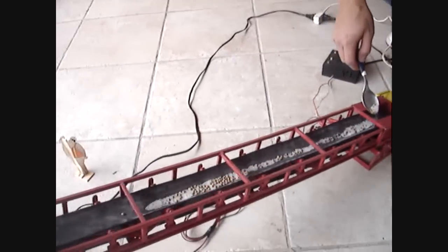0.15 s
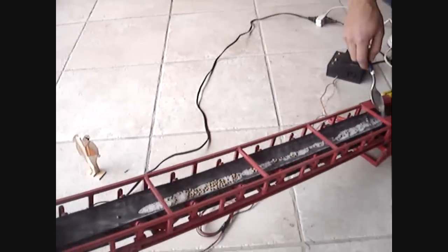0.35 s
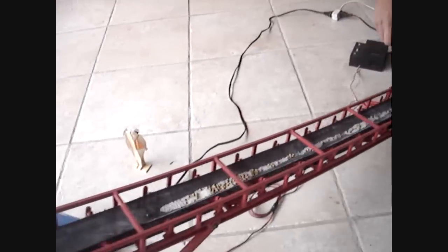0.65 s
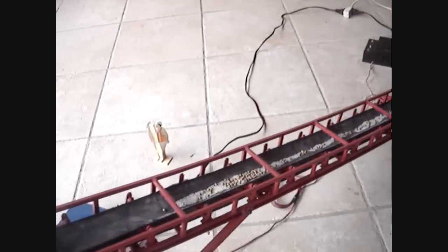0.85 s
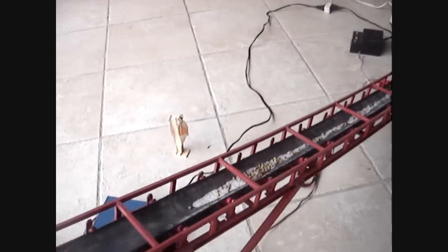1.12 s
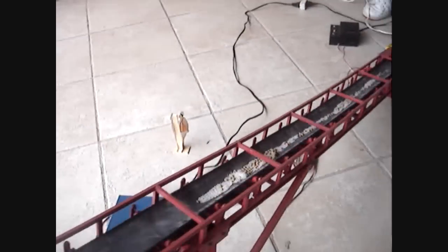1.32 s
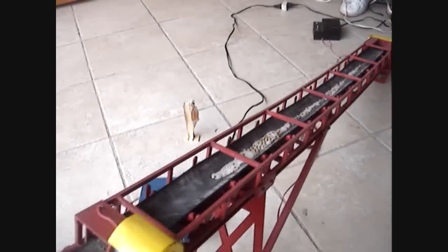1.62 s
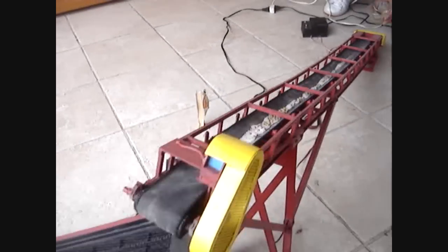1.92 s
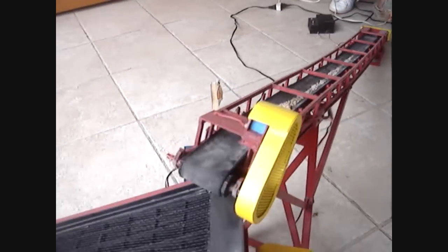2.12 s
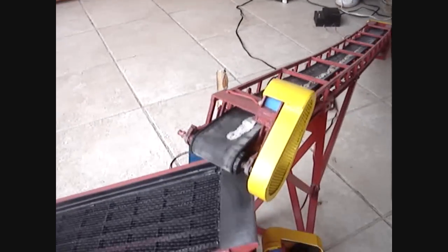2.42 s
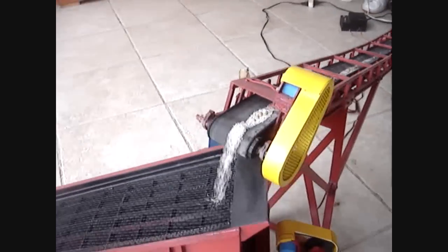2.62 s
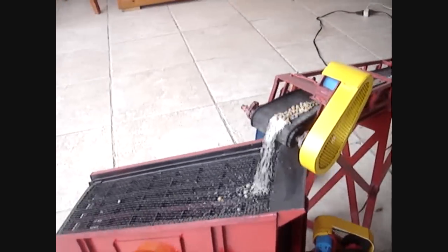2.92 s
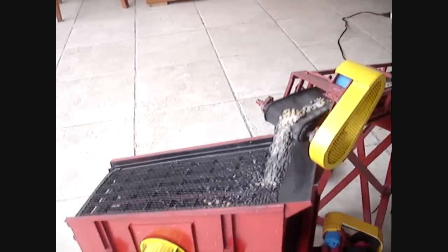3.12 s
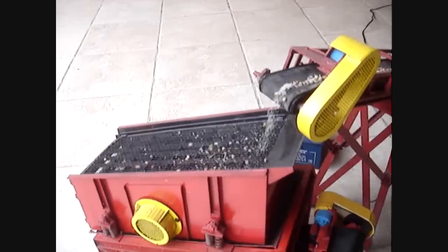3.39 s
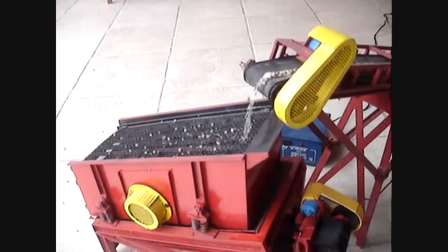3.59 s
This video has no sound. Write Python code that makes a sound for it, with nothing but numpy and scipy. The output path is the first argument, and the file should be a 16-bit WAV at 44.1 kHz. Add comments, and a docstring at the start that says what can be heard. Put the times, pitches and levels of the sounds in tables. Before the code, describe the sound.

A miniature belt drive and shaking steel screen rattle harshly indoors as fine gravel clatters down

```python
"""First comes the fluttering churn of a model conveyor's belt drive, with hollow knocks and wavering tones.
Its motor carries fine gravel up to a vibrating screen, on a tiled floor indoors.
The screen's loose steel deck chatters on every turn of its eccentric shaft, made of bursts of tiny impacts.
The microphone moves up the belt to the screen: brief rattles and hard clashes of the deck are heard.
Then gravel starts to pour onto the mesh, as random clicks shaped by filters, with ringing pings of steel."""
import sys
import numpy as np
from scipy import signal
from scipy.fft import rfft, irfft, next_fast_len
from scipy.io import wavfile

SR = 44100
rng = np.random.default_rng(int(sys.argv[2]) if len(sys.argv) > 2 else 0)


def persist_wave(psi):
    """Save psi, clipped to +-1, as 16-bit WAV."""
    counts = np.round(np.clip(psi, -1, 1) * 32767).astype(np.int16)
    wavfile.write(sys.argv[1], SR, np.atleast_2d(counts).T)


N = 165375
T = np.arange(N) / SR  # time of each sample [s]

# Levels in the tables are relative, before the filters, room and recorder.
# Sources as the microphone moves: (time [s], belt drive [dB], screen body [dB], mesh chatter [dB])
NEARNESS = [(0, -25.5, -30, -42), (.4, -26.5, -30.5, -42.5), (.68, -24, -33.5, -41.5),
            (1.0, -25, -32, -40.5), (1.22, -27, -25.5, -38), (1.48, -26, -28, -41.5),
            (1.53, -31, -23.5, -40.5), (1.64, -25, -28, -38), (1.77, -25.5, -28, -39.5),
            (1.85, -25.5, -26.5, -37.5), (2.15, -25, -25.5, -34.5), (2.55, -28.5, -23, -36.5),
            (3.0, -28.5, -24.5, -34), (3.4, -26, -24, -29.5), (3.75, -24, -25.5, -33.5)]
# Microphone comes round to the open top of the screen: (start [s], end [s])
ARRIVAL_S = (2, 2.02)
# Edges of the neighbouring bands in which tiny impacts ring: (frequency [Hz])
CONTACT_BANDS_HZ = [60, 480, 850, 1500, 2800, 4600, 7000, 14000]

# Broad colour of each sound: (frequency [Hz], relative level per Hz [dB])
DRIVE_COLOUR = [(70, -26), (150, -16.5), (205, -18), (255, -7.5), (400, -13.5), (650, -1.5), (800, -0.5),
                (1100, -2), (1700, -8.5), (3200, -12), (5000, -17.5), (7000, -21), (10000, -30.5)]
BODY_COLOUR = [(100, -36.5), (210, -14), (260, -10.5), (370, -2.5), (520, -1), (650, 1.5), (800, -6.5),
               (1050, -2.5), (1450, -8.5), (1800, -7.5), (3200, -10.5), (5000, -16.5), (10000, -45)]
MESH_COLOUR = [(500, -15.5), (1500, -10), (2600, -1), (3500, 0), (4500, -0.5), (5400, -6), (6500, -5),
               (8000, -10.5), (10000, -12.5)]
RUMBLE_COLOUR = [(20, -2), (42, -15), (85, -11), (120, -4), (170, -5), (300, 4), (2000, -37)]
RATTLE_COLOUR = [(250, -10.5), (380, 7.5), (900, -2), (1500, 7.5), (2200, -8), (3500, -9.5), (5000, -1),
                 (10000, -16)]
CLASH_COLOUR = [(500, -21), (2000, -22), (2800, -10), (3400, 1), (4400, -8.5), (5300, 1), (6200, 0.5),
                (7300, -13.5), (8500, -14.5), (10000, -18)]
GRAVEL_COLOUR = [(300, -24.5), (1000, -2), (1800, -8.5), (2400, 0.5), (3300, -3.5), (4500, -5),
                 (6000, -4.5), (8000, -10), (10000, -14)]

# Resonances of the conveyor frame: (frequency [Hz], width [Hz], lift [dB])
FRAME_MODES = [(274, 18, 5.5), (510, 35, 4), (615, 8.7, 10), (727, 17, 5), (947, 17, 3)]
# Resonances of the screen box heard from along the belt: (frequency [Hz], width [Hz], lift [dB])
FAR_MODES = [(400, 210, 4), (553, 28, 0), (698, 29, 6), (1043, 98, 1.5), (1360, 720, 6.5)]
# Resonances of the screen: (frequency [Hz], width [Hz], lift [dB])
SCREEN_MODES = [(358, 36, 4.5), (427, 13, 4), (623.5, 66, 6.5), (743, 38, 3.1), (948, 60, 6.5),
                (1448, 150, 8.6), (1720, 32, 3.8), (2730, 26, 1.5), (3410, 88, 3.4)]

# Strokes in one turn of the shaft: (delay [s], length [s], body level [dB], mesh level [dB])
STROKES = [(.009, 0.0026, -3.5, -8), (0.026, 0.00073, -8.5, 19), (0.034, 0.0035, -5, 15.5),
           (.043, 0.0026, -8, -10.5)]
# Motor hum: (frequency [Hz], rms level [dB])
HUM = [(29.9, -62), (59.8, -61.5)]
# Unsteady tones of the belt drive, one list for each: (time [s], pitch [Hz], level [dB])
WHINES = [
    [(0, 760, -40), (.04, 750, -29), (.1, 772, -31), (.2, 745, -37), (.4, 750, -40)],
    [(.05, 610, -42), (.1, 615, -29), (.17, 615, -39), (.24, 622, -28), (.33, 620, -44), (.62, 597, -36),
     (.72, 595, -44), (.81, 597, -30), (.9, 610, -42)],
    [(.18, 695, -36), (.4, 690, -42), (.7, 698, -32), (.85, 705, -38), (1.0, 683, -30.5), (1.14, 660, -37)],
    [(.56, 945, -42), (.61, 938, -27.5), (.75, 925, -33), (.83, 930, -29), (.95, 900, -34),
     (1.14, 905, -36)],
]
# Knocks in the conveyor frame and the screen box: (time [s], level [dB], pitch [Hz])
KNOCKS = [(.041, -34, 750), (0.091, -18, 626), (.146, -20, 790), (0.664, -17, 884), (0.825, -18, 940),
          (1.164, -17, 596), (1.212, -14.5, 985), (1.426, -15, 820), (1.533, -23, 660), (1.562, -19, 390),
          (1.634, -18, 1030), (1.657, -15.5, 684), (1.688, -13.5, 710), (1.831, -19, 372),
          (1.846, -16, 703), (1.874, -15.5, 390), (1.951, -17.5, 610), (2.555, -13.5, 670),
          (2.637, -17, 716), (2.716, -22, 613), (2.77, -14.5, 483), (3.03, -14, 660), (3.059, -16, 696),
          (3.321, -14, 656), (3.352, -14.5, 600), (3.448, -21, 1010)]
# Parts of one knock: (ratio to its pitch [1], added level [dB])
KNOCK_PARTIALS = [(0.742, -16), (0.999, 3), (1.332, -2)]
# Band to which the knocks are limited: (low edge [Hz], high edge [Hz])
KNOCK_BAND_HZ = (320, 1300)
# Faint squeaks, probably of a roller, one list for each: (time [s], pitch [Hz], level [dB])
SQUEAKS = [
    [(.9, 1290, -37), (.93, 1470, -31), (.952, 1520, -31), (.975, 1350, -33), (.99, 1370, -31),
     (1.005, 1490, -29.5), (1.03, 1630, -34), (1.055, 1820, -37), (1.085, 1830, -39)],
    [(1.22, 1930, -42), (1.32, 2023, -37.5), (1.4, 1910, -43)],
]
# Loose parts rattle for a moment: (time [s], length [s], level [dB])
RATTLES = [(1.516, 0.0048, -24), (1.567, .011, -26.5), (1.826, 0.007, -21), (1.869, 0.0042, -19),
           (2.192, 0.0035, -25), (2.292, 0.0082, -25), (2.386, 0.0052, -25), (2.456, 0.0048, -21),
           (2.685, 0.0059, -29), (2.706, 0.0087, -25), (2.759, .004, -36), (2.971, 0.0071, -20)]
# Hard clashes of the deck: (time [s], length [s], buzz level [dB], crack level [dB], thud level [dB])
CLASHES = [(1.816, 0.0022, -26.5, -18, -30), (1.872, 0.0026, -27, -17, -25), (2.18, .003, -26, -4, -32),
           (2.236, 0.0018, -19.5, -11, -19), (2.286, 0.0015, -20, -10, -20), (2.343, 0.0025, -19, -2, -25),
           (2.392, .0025, -30, -11, -26), (2.463, 0.0021, -29, -12, -31), (2.499, 0.0025, -19, -16, -20.5),
           (2.659, 0.0033, -16.5, -8, -17.5), (2.709, 0.0025, -26, -18, -26.5),
           (2.764, 0.0025, -17.5, 1, -34), (2.801, 0.0014, -20.5, -9, -25), (2.816, .0025, -24, -3, -23),
           (2.869, 0.0018, -20.5, -4, -20.5), (2.923, 0.0023, -17, -8, -18),
           (3.028, 0.0019, -12, -11, -19.5), (3.131, 0.0022, -21, -6, -36), (3.188, 0.003, -18, -16, -22)]
# Gravel landing on the mesh: (time [s], level [dB])
POUR = [(2.6, -84), (2.8, -35), (3.0, -50), (3.08, -29), (3.28, -26), (3.36, -23), (3.52, -20),
        (3.62, -27.5), (3.75, -22.5)]
# The biggest stones strike the mesh, on top of the pour: (time [s], level [dB])
STONES = [(3.096, 4), (3.446, -7), (3.525, -8), (3.595, 0), (3.712, -6)]
# Pings of the steel mesh: (time [s], starting level [dB], pitch [Hz])
PINGS = [(3.234, -16, 3320), (3.287, -17, 3430), (3.339, -20, 3380), (3.392, -20, 3400), (3.497, -20, 3385),
         (3.655, -11.5, 3300)]

# Rates of contacts are for each band; a larger spread makes their sizes more uneven.
DRIVE_CONTACTS_PER_S, DRIVE_SPREAD_DB = 900, 1
CHATTER_PER_S, CHATTER_SPREAD_DB = 3000, 1.0
RATTLE_CONTACTS_PER_S, RATTLE_SPREAD_DB = 1400, 1
CLASH_CONTACTS_PER_S, CLASH_SPREAD_DB = 5000, 0
GRAINS_PER_S, GRAIN_SPREAD_DB = 1200, 4.5
STONES_PER_S, STONE_SPREAD_DB, STONE_DB = 400, 2.0, -6  # this rate is for all bands together
PATCHY_DB, PATCHY_PER_S = 0.83, 7.65  # slow unevenness of the contacts in each band
FLUTTER_DB, FLUTTER_PER_S = 1.74, 110  # uneven running of the belt drive
MESH_ROUGH_DB, MESH_ROUGH_PER_S = -2.5, 330  # the loose mesh catches and lets go
SHAKE_HZ = 19.03  # turns of the screen's shaft per second
STROKE_SPREAD_DB, STROKE_JITTER_S, STROKE_FADE_S = 1.5, 0.0006, 0.0029
BODY_REST_DB, MESH_REST_DB = -6, -9  # steady clatter under the strokes
THUD_DELAY_S, THUD_S, THUD_FADE_S = 0.0049, 0.0045, 0.0046
TONE_WANDER, TONE_FLICKER_DB, TONE_WANDER_PER_S = 0.004, 1.5, 30  # wander is a fraction of the pitch
KNOCK_T60_S, PING_T60_S = 0.035, 0.04  # time to die away by 60 dB
RUMBLE_DB = -49
ROOM_T60_S, ROOM_DB, ROOM_GAP_S = 0.14, -14.5, 0.0061
CUTOFF_HZ, PEAK_LIMIT, EDGE_FADE_S = 10050, 0.9, 0.002


def from_db(db):
    """Turn decibels into a gain."""
    return 10 ** (np.asarray(db) / 20)


def rms_one(x):
    """Scale a signal to an average power of one."""
    return x / np.sqrt(np.mean(x ** 2) + 1e-20)


def gains(rows):
    """Read each level column as a gain at every sample."""
    times, *columns = np.transpose(rows)
    return [from_db(np.interp(T, times, column)) for column in columns]


def drift(per_s):
    """Wander in straight lines between random values, per_s of them each second."""
    knots = rng.standard_normal(size=2000)
    return np.interp(T * per_s, np.arange(len(knots)), knots)


def colour(x, spectrum, modes=()):
    """Filter a sound with a broad colour lifted at each resonance, so that nothing rings early."""
    size = 2 * next_fast_len(N // 2 + SR // 10)
    hz = np.arange(size // 2 + 1) * SR / size + 1e-3
    points = np.array(spectrum)
    db = np.interp(np.log(hz), np.log(points[:, 0]), points[:, 1])
    for centre, width, lift in modes:
        db = db + lift / (1 + (2 * (hz - centre) / width) ** 2)
    gain = rms_one(from_db(db) / (1 + (hz / CUTOFF_HZ / 2) ** 20))
    # Unit power gain, counting only what lies below the cutoff.
    gain = gain / np.sqrt(np.mean(gain ** 2 * (hz < CUTOFF_HZ)))
    # Folding the cepstrum gives the filter a response only after each input.
    cepstrum = irfft(np.log(gain))
    cepstrum[1:size // 2] *= 2
    cepstrum[size // 2 + 1:] = 0
    response = np.exp(rfft(cepstrum))
    return irfft(rfft(x, size) * response)[:N]


def clicks(per_s, spread_db):
    """Place single-sample impacts of uneven size and either sign at random moments."""
    out = np.zeros(N)
    at = np.flatnonzero(rng.random(N) < per_s / SR)
    size, side = rng.random((2, N))[:, at]
    uneven = np.minimum(-np.log(1 - size), 3)  # many small, few large
    out[at] = from_db(spread_db * uneven) * np.sign(side - .5)
    return out


def contacts(per_s, spread_db):
    """Add tiny uneven impacts, each ringing in one band, with a nearly flat spectrum overall."""
    out = 0
    for edges in zip(CONTACT_BANDS_HZ, CONTACT_BANDS_HZ[1:]):
        patchy = from_db(PATCHY_DB * drift(PATCHY_PER_S))
        hits = rms_one(clicks(per_s, spread_db) * patchy)
        band = signal.butter(2, edges, "band", fs=SR, output="sos")
        out = out + signal.sosfilt(band, hits + 1e-18)
    return out


def bursts(times, levels_db, length_s, fade_s):
    """Make the power curve of short bursts that swell quickly and die away."""
    marks = np.zeros(N)
    inside = (times >= 0) & (times < N / SR)
    samples = (times[inside] * SR).astype(int)
    np.add.at(marks, samples, from_db(levels_db[inside]) ** 2)
    bell = signal.windows.gaussian(SR // 10 + 1, length_s * SR / np.sqrt(2))
    shape = signal.lfilter([1], [1, -np.exp(-1 / (fade_s * SR))], bell)
    return np.abs(signal.fftconvolve(marks, shape / shape.max(), "same"))


def swell(s, length, db):
    """Make the power curve of one brief bell-shaped burst."""
    out = np.zeros(N)
    near = np.abs(T - s) < 10 * length
    out[near] = from_db(db) ** 2 * np.exp(-((T[near] - s) / length) ** 2)
    return out


def ring(s, db, hz, t60):
    """Let one struck resonance sound as a sine that dies away."""
    age = np.maximum(T - s, 0)
    level = from_db(db - 60 * np.minimum(age / t60, 2))
    return level * np.sin(2 * np.pi * hz * age)


def tone(rows):
    """Sound a slightly unsteady sine that follows a curve of pitch and level."""
    times, hz, db = np.transpose(rows)
    pitch = np.interp(T, times, hz) * (1 + TONE_WANDER * drift(TONE_WANDER_PER_S))
    gate = np.clip(np.minimum(T - times[0], times[-1] - T) / EDGE_FADE_S, 0, 1)
    level = gate * from_db(np.interp(T, times, db) + TONE_FLICKER_DB * drift(TONE_WANDER_PER_S))
    cycles = np.cumsum(pitch) / SR + rng.random()
    return level * np.sqrt(2) * np.sin(2 * np.pi * cycles)


def conveyor():
    """Gears, rollers and belt: a fluttering churn of tiny contacts rings the frame."""
    flutter = rms_one(from_db(FLUTTER_DB * drift(FLUTTER_PER_S)))
    churn = flutter * contacts(DRIVE_CONTACTS_PER_S, DRIVE_SPREAD_DB)
    return colour(churn, DRIVE_COLOUR, FRAME_MODES)


def screen(body_gain, mesh_gain):
    """Each turn of the shaft throws the deck against its box: the body clatters and the mesh chatters."""
    turns = np.arange(-1, N / SR * SHAKE_HZ) / SHAKE_HZ
    body_power = from_db(BODY_REST_DB) ** 2
    mesh_power = from_db(MESH_REST_DB) ** 2
    for delay, length, body_db, mesh_db in STROKES:
        chance = rng.standard_normal((len(turns), 3))
        times = turns + delay + STROKE_JITTER_S * chance[:, 0]
        body_levels = body_db + STROKE_SPREAD_DB * chance[:, 1]
        mesh_levels = mesh_db + STROKE_SPREAD_DB * chance[:, 2]
        body_power = body_power + bursts(times, body_levels, length, STROKE_FADE_S)
        mesh_power = mesh_power + bursts(times, mesh_levels, length, STROKE_FADE_S)
    clatter = np.sqrt(body_power) * contacts(CHATTER_PER_S, CHATTER_SPREAD_DB)
    body = body_gain * rms_one(clatter)
    rough = from_db(MESH_ROUGH_DB * drift(MESH_ROUGH_PER_S))
    chatter = np.sqrt(mesh_power) * rough * contacts(CHATTER_PER_S, CHATTER_SPREAD_DB)
    mesh = mesh_gain * rms_one(chatter)
    close = np.interp(T, ARRIVAL_S, [0, 1])
    far_body = colour((1 - close) * body, BODY_COLOUR, FAR_MODES)
    near_body = colour(close * body, BODY_COLOUR, SCREEN_MODES)
    return far_body + near_body + colour(mesh, MESH_COLOUR, SCREEN_MODES)


def background():
    """Low sine tones of motor hum sound over filtered noise, the rumble of the room."""
    hum = 0
    for hz, db in HUM:
        hum = hum + from_db(db) * np.sqrt(2) * np.sin(2 * np.pi * (hz * T + rng.random()))
    return hum + from_db(RUMBLE_DB) * colour(rng.standard_normal(N), RUMBLE_COLOUR)


def whine():
    """The belt drive sings on a few wavering tones that come and go."""
    return sum(tone(rows) for rows in WHINES)


def knocks():
    """The conveyor frame and screen box give short, dull, hollow knocks of a few dying partials."""
    rings = 0
    for s, db, hz in KNOCKS:
        for ratio, partial_db in KNOCK_PARTIALS:
            rings = rings + ring(s, db + partial_db, hz * ratio, KNOCK_T60_S)
    band = signal.butter(4, KNOCK_BAND_HZ, "band", fs=SR, output="sos")
    return signal.sosfilt(band, rings)


def squeaks():
    """Thin tones glide in pitch under the churn."""
    return sum(tone(rows) for rows in SQUEAKS)


def rattles():
    """Loose parts break into short, coarse, broad rattles made of tiny impacts."""
    power = sum(swell(*row) for row in RATTLES)
    shaken = np.sqrt(power) * contacts(RATTLE_CONTACTS_PER_S, RATTLE_SPREAD_DB)
    return colour(shaken, RATTLE_COLOUR)


def clashes():
    """On some turns the deck hits hard: a crack in a ragged steel buzz, then a thud of the box."""
    times, _, _, crack_db, thud_db = np.transpose(CLASHES)
    buzz_power = sum(swell(s, length, buzz_db) for s, length, buzz_db, _, _ in CLASHES)
    rough = rms_one(from_db(MESH_ROUGH_DB * drift(MESH_ROUGH_PER_S)))
    buzz = np.sqrt(buzz_power) * rough * contacts(CLASH_CONTACTS_PER_S, CLASH_SPREAD_DB)
    buzz[(times * SR).astype(int)] += from_db(crack_db)  # each crack is one impulse
    thud_power = bursts(times + THUD_DELAY_S, thud_db, THUD_S, THUD_FADE_S)
    thud = np.sqrt(thud_power) * contacts(CLASH_CONTACTS_PER_S, CLASH_SPREAD_DB)
    return colour(buzz, CLASH_COLOUR) + colour(thud, BODY_COLOUR, SCREEN_MODES)


def gravel():
    """Fine grains rush onto the mesh, bigger stones click sharply, and the struck wires ping."""
    flow, = gains(POUR)
    grains = contacts(GRAINS_PER_S, GRAIN_SPREAD_DB)
    stones = from_db(STONE_DB) * rms_one(clicks(STONES_PER_S, STONE_SPREAD_DB))
    impacts = flow * (grains + stones)
    for s, db in STONES:
        impacts[int(s * SR)] += from_db(db)
    pings = sum(ring(s, db, hz, PING_T60_S) for s, db, hz in PINGS)
    return colour(impacts, GRAVEL_COLOUR, SCREEN_MODES) + pings


def room(x):
    """Tiles and walls add a short diffuse tail, made of noise that dies away."""
    age = T[:SR // 2]
    decay = np.exp(-np.log(1000) * age / ROOM_T60_S)
    tail = rng.standard_normal(len(age)) * decay * (age > ROOM_GAP_S)
    echo = signal.fftconvolve(x, tail / np.linalg.norm(tail))[:N]
    return x + from_db(ROOM_DB) * echo


def scene():
    """Mix conveyor, screen and gravel in the room, then add the background."""
    drive_gain, body_gain, mesh_gain = gains(NEARNESS)
    machine = drive_gain * conveyor() + screen(body_gain, mesh_gain)
    machine = machine + whine() + knocks() + squeaks()
    machine = machine + rattles() + clashes() + gravel()
    return (room(machine) + background())[None]


def record(dry):
    """The recorder clips peaks over its limit and cuts the top steeply; the ends are faded."""
    low_pass = signal.firwin(401, CUTOFF_HZ, window=("kaiser", 8), fs=SR)
    fade = np.clip(np.minimum(T, T[-1] - T) / EDGE_FADE_S, 0, 1)
    clipped = np.clip(dry, -PEAK_LIMIT, PEAK_LIMIT)
    return signal.fftconvolve(fade * clipped, low_pass[None], "same", axes=1)


dry = scene()
out = record(dry)
persist_wave(out)
```